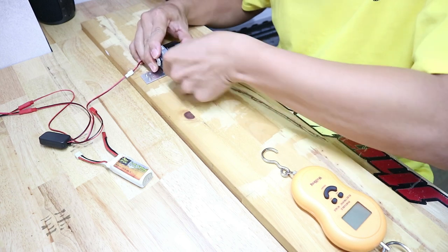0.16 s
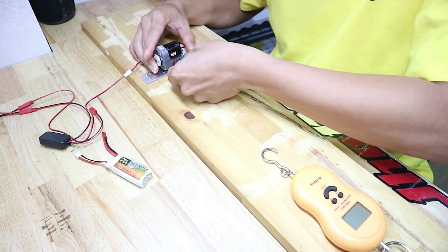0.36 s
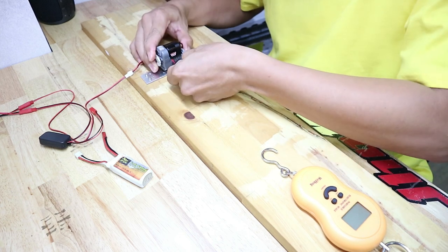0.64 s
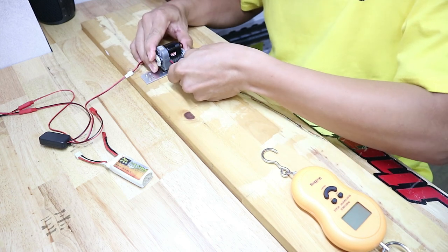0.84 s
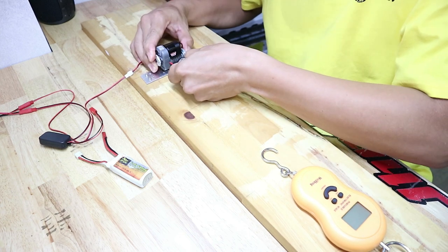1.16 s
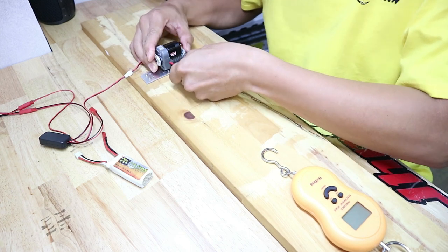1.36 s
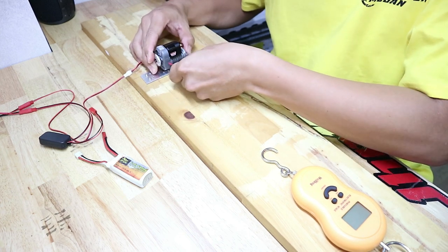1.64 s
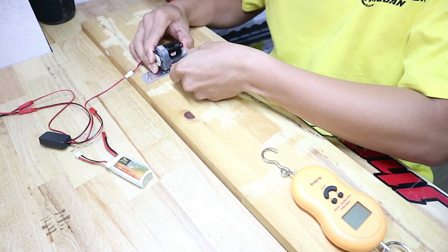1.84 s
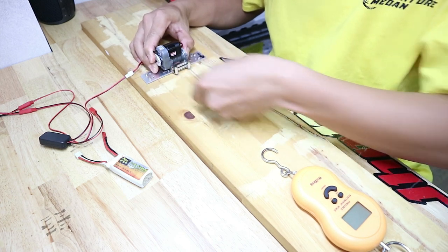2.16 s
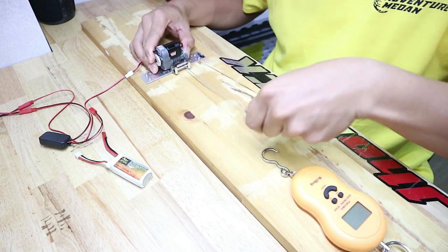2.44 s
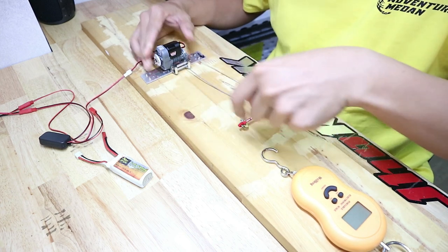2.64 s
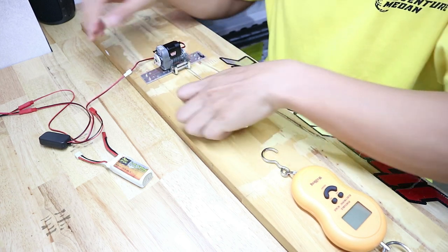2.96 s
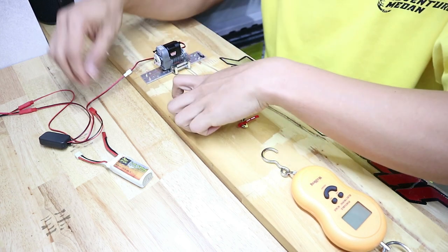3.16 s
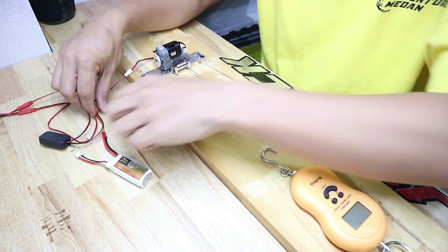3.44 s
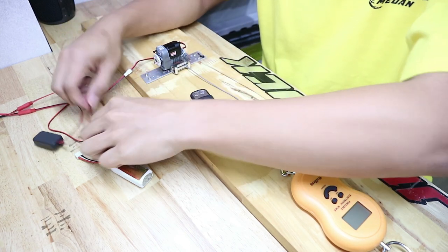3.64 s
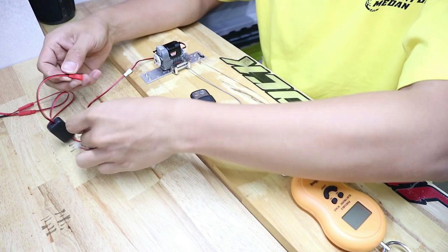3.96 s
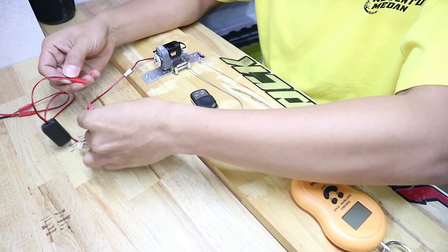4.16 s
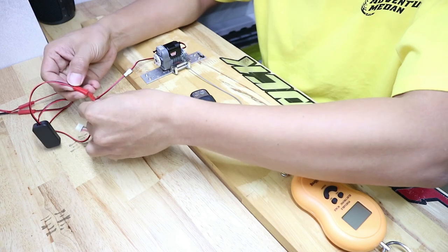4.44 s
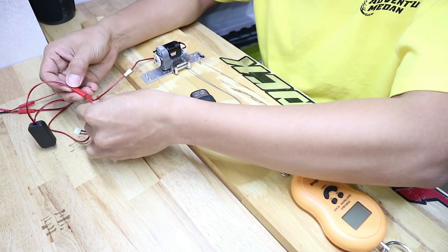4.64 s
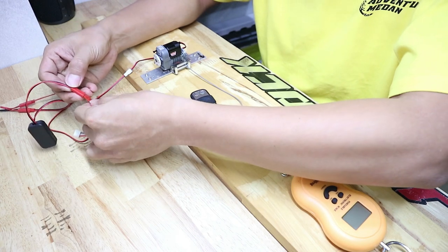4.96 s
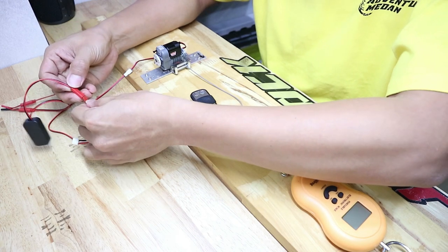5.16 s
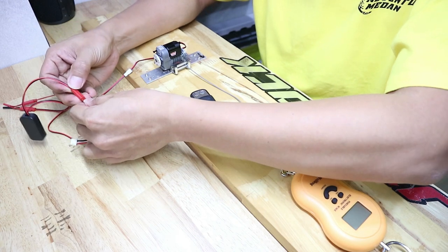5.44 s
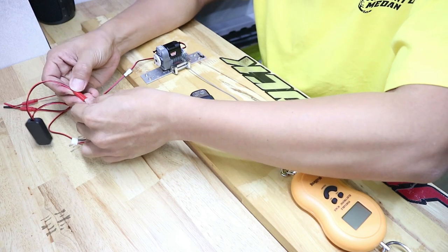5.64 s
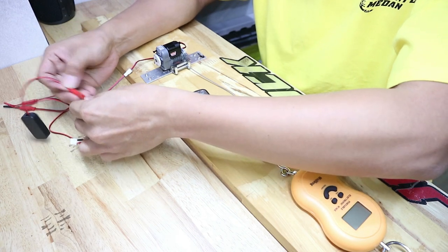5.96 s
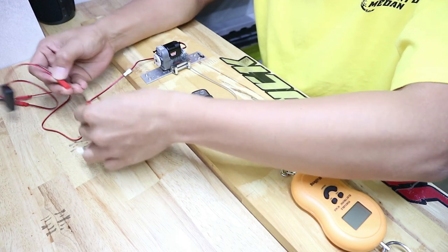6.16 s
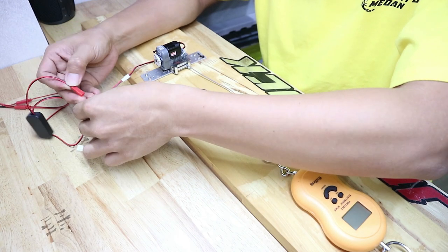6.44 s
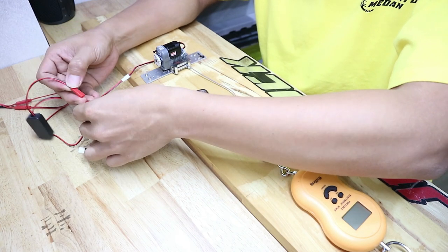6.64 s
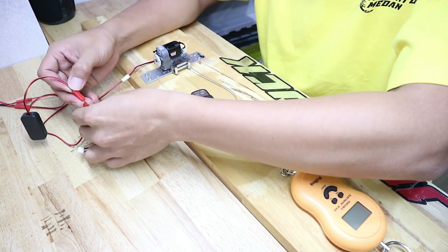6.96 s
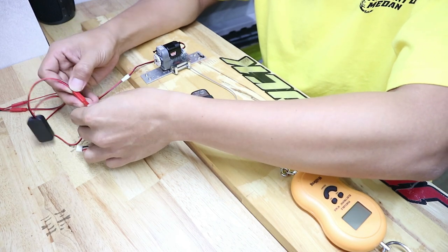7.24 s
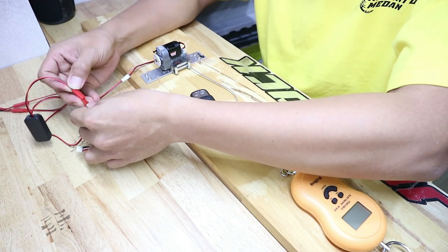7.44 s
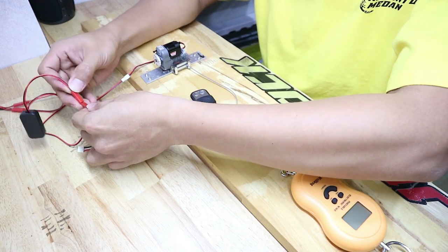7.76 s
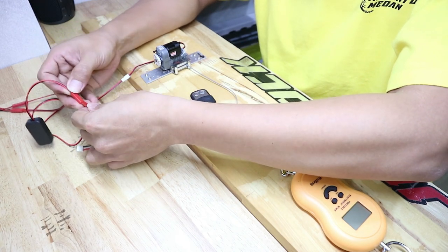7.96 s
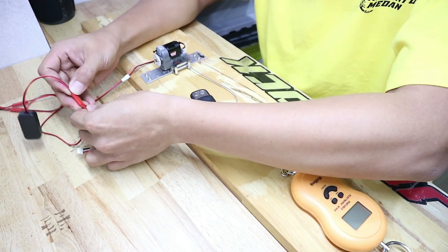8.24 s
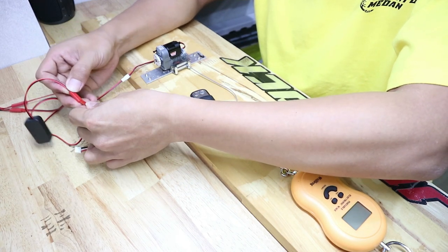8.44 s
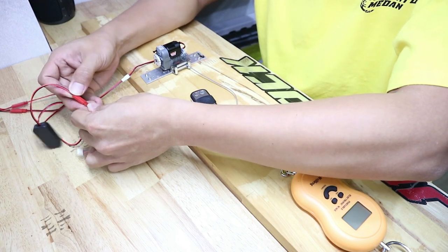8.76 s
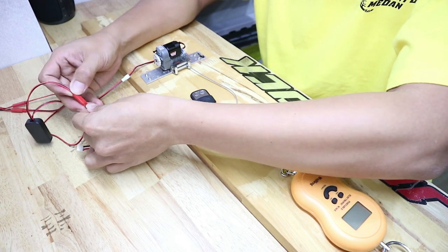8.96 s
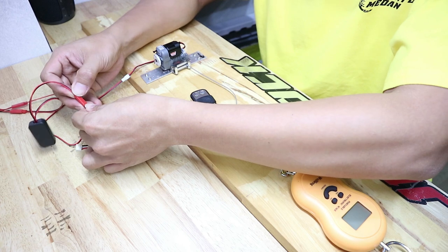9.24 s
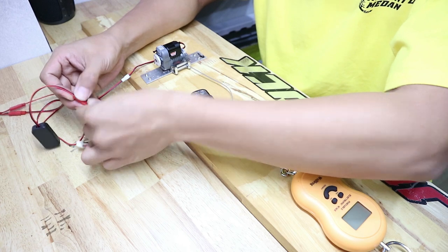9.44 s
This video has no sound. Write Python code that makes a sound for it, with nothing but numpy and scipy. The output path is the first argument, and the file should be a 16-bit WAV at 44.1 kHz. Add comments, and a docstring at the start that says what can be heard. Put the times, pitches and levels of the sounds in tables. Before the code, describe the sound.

A small quiet room, heard closely in stereo, with low mains hum and soft air. From 0 to 1.4 s fingers make faint clicks and scrapes on small winch parts, with a short drag around 0.5. A loud, sharp snap comes at 1.5, clacks near 1.9, and a cluster of clicks and rubbing from 2.2 to 2.6. At 3.25 a metal hook hits the wooden board and bounces in a quick, weakening rattle. Wires brush and knock at 3.6-3.9, then a hollow stuttering scrape near 4.0-4.2. At 5.65 a small geared motor starts abruptly, whining and rasping, cuts at 6.05 and coasts down by about 6.35. A distant engine swells around 5.5 and slowly recedes. Faint pin ticks and wire rustles follow from 6.4. A plug knocks at 8.87; the motor whirs again at 9.3, with a hard knock at 9.5, coasting from 9.7.

```python
"""A small room with a wooden workbench: fingers work the hook of a model winch loose and drop it on the board,
drag the wiring over, then touch a battery plug to the leads, and the motor whirs up twice and coasts down.
Blows ring damped modes with noise bursts, rubbing is shaped noise, and the motor is shaft orders plus gear rasp.
Mains hum, room air and a passing distant engine lie beneath; a camera's gain control ducks on loud peaks."""
import sys
import numpy as np
from scipy import signal
from scipy.fft import rfft, irfft, next_fast_len
from scipy.io import wavfile
from scipy.ndimage import uniform_filter1d, minimum_filter1d, map_coordinates

SR = 44100
rng = np.random.default_rng(int(sys.argv[2]) if len(sys.argv) > 2 else 0)


def store_pcm(level_fs):
    """Save levels as 16-bit WAV."""
    pcm = np.round(np.clip(level_fs, -1, 1) * 32767).astype(np.int16)
    wavfile.write(sys.argv[1], SR, np.atleast_2d(pcm).T)


N = 422919

# Winch parts clicking in the fingers. Each row: start in seconds, level in dB before the trim of the group,
# knock in the board in dB and sharp tick in dB, both relative to the click and trimmed later.
CLACK_HITS = [(0.053, -39, 1.5, -8), (0.413, -31, -7, -38), (0.457, -31, 0.5, -30),
              (0.556, -33.5, -20, -39), (0.982, -35, -4, -38), (1.376, -40.5, -17, -30.5),
              (1.477, 2, -21.5, -12), (1.612, -29.5, -1.5, -10), (1.644, -41.5, -24, -4),
              (1.716, -37.5, -1.5, -16), (1.753, -39.5, -11, -3.5), (1.881, -13.5, -14.5, -10.5),
              (1.911, -12, -3, -20), (1.938, -27, -19, -31), (2.030, -49, 7, -10), (2.201, -28.5, -12, -36),
              (2.222, -36, -7, -24), (2.269, -29.5, -16, -25), (2.291, -27, -10.5, -31),
              (2.333, -23, -0.5, -34), (2.346, -25.5, 0, -30.5), (2.383, -28, -1, -26),
              (2.420, -16.5, -9.5, -37), (2.437, -14.5, -7, -12), (2.446, -6, -34, -28),
              (2.536, -37, 2, -8), (2.605, -22, -11.5, -12), (2.835, -44.5, -20.5, -10.5),
              (2.892, -46, -10, -18)]
# Plugs knocking on the bench or snapping together. Each row: start in seconds, level in dB, relative tick in dB.
PLUG_HITS = [(3.63, -19, -29), (8.871, -7.5, -39), (9.4956, -4.5, -32), (9.4973, -1.5, -20.5)]
# Sharp edge of a contact. Each row: frequency in Hz, relative level in dB.
TICK_COLOUR = [(1500, -36), (3500, 3.5), (5800, 0), (7800, -11.5), (11000, -24.5), (16000, -29.5)]
# Casing resonances that gear teeth and fingers excite. Each row: centre in Hz, width in Hz, level in dB.
CASING_PEAKS = [(1214.6, 18, 6), (1440, 78, -2), (1920, 16, -1.5), (2140, 65, 8.5), (2430, 49, 0.5),
                (2850, 41, 3.5), (3390, 61, -1), (4520, 62, -7.5), (5550, 79, -11.5)]
# Stereo spread of sound from all sides. Each row: frequency in Hz, gain of the side signal in dB.
SIDE_GAIN = [(60, -35.5), (150, -27.5), (400, -9.5), (1300, -1), (2500, 1), (5000, 4), (9000, 8)]


def amp(db):
    """Amplitude factor of a level in dB."""
    return 10 ** (np.asarray(db) / 20)


def unit(x):
    """x scaled to rms 1."""
    return x / np.sqrt(np.mean(x ** 2) + 1e-20)


def along(points, hz):
    """Read a curve of (Hz, value) points on a log frequency axis."""
    f, v = np.transpose(points)
    return np.interp(np.log(hz + 1), np.log(f), v)


def curves(rows):
    """One value per sample for each column after the time."""
    s, *cols = np.transpose(rows)
    return [np.interp(np.arange(N) / SR, s, c) for c in cols]


def wobble(rate):
    """A smooth random curve with rate knots a second."""
    knots = rng.standard_normal(int(N * rate / SR) + 4)
    return map_coordinates(knots, [np.arange(N) * rate / SR])


def filtered(x, response):
    """x times a complex response of frequency."""
    n = x.shape[-1]
    m = next_fast_len(n + SR // 2)
    return irfft(rfft(x, m) * response(np.fft.rfftfreq(m, 1 / SR)), m)[..., :n]


def coloured(x, spectrum, size=2048):
    """x through a causal minimum-phase filter of the given (Hz, dB) shape."""
    cepstrum = irfft(np.log(amp(along(spectrum, np.fft.rfftfreq(size, 1 / SR)))))
    # folding the cepstrum onto positive time makes the filter minimum phase
    cepstrum[1:size // 2] *= 2
    cepstrum[size // 2 + 1:] = 0
    return signal.fftconvolve(x, irfft(np.exp(rfft(cepstrum))))[:len(x)]


def resonate(x, peaks):
    """x through parallel second-order resonances, each (Hz, width in Hz, dB)."""
    def response(f):
        return sum(amp(db) * 1j * f * w / (c * c - f * f + 1j * f * w) for c, w, db in peaks)
    return filtered(x, response)


def add(track, s, sound):
    """Lay a sound into a track at s seconds."""
    part = track[max(round(s * SR), 0):][:len(sound)]
    part += sound[:len(part)]


def diffuse(spectrum):
    """Stereo noise from all sides: independent mid, of rms 1, and side."""
    mid = unit(coloured(rng.standard_normal(N), spectrum))
    side = coloured(unit(coloured(rng.standard_normal(N), spectrum)), SIDE_GAIN)
    return np.array([mid + side, mid - side])


def hum():
    """Mains hum: sines that waver in level and phase."""
    # Each row: frequency in Hz, mean level in dB.
    partials = [(48.6, -43.5), (97.5, -51), (145, -46), (197, -54.5), (243, -54), (291, -56.5)]
    t = np.arange(N) / SR
    return sum(amp(db + 1.7 * wobble(8.3)) * np.sin(2 * np.pi * hz * t + 0.28 * wobble(3.0))
               for hz, db in partials)


def passing():
    """Level of the engine in dB: it nears quickly and recedes slowly."""
    nearest_s, nearest_db = 5.5, -40
    approach_s, recede_s = 0.68, 3.1  # time from half power to the peak, and from the peak to half power
    since = np.arange(N) / SR - nearest_s
    return nearest_db - 10 * np.log10(1 + (since / np.where(since < 0, approach_s, recede_s)) ** 2)


def engine():
    """Distant engine: multiples of its firing rate excite room modes, over a diffuse roar."""
    # Speed as it passes. Each row: time in seconds, mean firings per second.
    firing_rate = [(4.4, 60), (5.2, 63), (5.8, 63), (6.4, 59.5), (7.4, 55), (8.3, 49.5), (9.2, 51.5)]
    # Each row: multiple of the firing rate, relative level in dB.
    exhaust_partials = [(2, 0), (3, 2), (4, -4.5), (5, 1.5), (6, -6.5), (7, -11), (8, -13.5)]
    # Room modes. Each row: centre in Hz, width in Hz, level in dB.
    room_modes = [(103, 26, -2.5), (115, 9, 5), (165, 10, 2.5), (207, 34, -5.5), (233, 12, 2.5),
                  (248.1, 11, 2), (287, 15, -1), (339.1, 58, -10)]
    # Each row: frequency in Hz, relative level in dB.
    roar_colour = [(50, -33.5), (100, -1), (170, -3), (290, 3), (380, -13), (500, -19.5), (650, -23),
                   (1000, -36), (2000, -39.5), (5000, -59)]
    firing, = curves(firing_rate)
    turn = 2 * np.pi * np.cumsum(firing * (1 + .007 * wobble(12))) / SR
    exhaust = sum(amp(db + 3 * wobble(5.8)) * np.sin(order * turn + rng.uniform(0, 2 * np.pi))
                  for order, db in exhaust_partials)
    exhaust = unit(resonate(exhaust, room_modes))  # each partial swells as it slides through a room mode
    return amp(passing()) * (amp(-1.0) * exhaust + amp(-6.5) * diffuse(roar_colour))


def background():
    """Room air as diffuse noise, with the mains hum and the distant engine."""
    # Each row: frequency in Hz, relative level in dB.
    air_colour = [(20, -34.5), (35, -24), (55, -9.5), (130, -8.5), (250, -6), (325, -8.5), (750, -31),
                  (1020, -24.5), (1600, -31.5), (2200, -32.5), (7000, -48.5), (8700, -47.5), (10500, -64),
                  (13000, -55.5), (15500, -61)]
    return hum() + amp(-50.0) * diffuse(air_colour) + engine()


def strokes(table, fall_s):
    """Gain of rubbing strokes: each swells to its peak and dies away, linearly in dB."""
    depth_db = 27.5  # rise and fall times each span this depth
    t = np.arange(N) / SR
    return sum(amp(db - depth_db * np.maximum((s - t) / rise_s, (t - s) / fall_s)) for s, rise_s, db in table)


def scrape(spectrum, grain_db, clump_db):
    """Friction of rms 1: noise whose level clumps like tiny slips."""
    slips = rng.standard_normal(N) * amp(grain_db * wobble(500) + clump_db * wobble(45))
    return unit(coloured(slips, spectrum))


def grit(rate=50, scatter_db=4.5, t60=.032):
    """Tiny random catches of skin and cable: decaying noise ticks that ring the winch casing, rms 1."""
    # Each row: frequency in Hz, relative level in dB.
    catch_colour = [(900, -19.5), (1300, -5.5), (2600, 3.5), (4000, -2.5), (6000, -11.5), (9000, -29),
                    (15000, -38)]
    strength = amp(scatter_db * np.clip(rng.standard_normal(N), -2, 2))
    catches = (rng.uniform(size=N) < rate / SR) * strength
    ticks = signal.lfilter([1], [1, -amp(-60 / (t60 * SR))], catches) * rng.standard_normal(N)
    return unit(unit(resonate(ticks, CASING_PEAKS)) + unit(coloured(ticks, catch_colour)))


def rubbing():
    """Fingers scrape and catch on the winch; wires brush over the bench and the hands."""
    # Fingers twist the hook. Each row: time of the peak in seconds, rise in seconds, relative level in dB.
    twists = [(0.1, 0.1, -58), (0.23, 0.15, -50.5), (0.42, 0.087, -56), (2.08, 0.4, -50.5),
              (2.21, 0.16, -48.5), (2.29, 0.055, -40.5), (2.41, 0.18, -40), (2.54, 0.045, -43),
              (3.2, 0.24, -54)]
    # Wires brush past. Each row: time of the peak in seconds, rise in seconds, level in dB before the trim.
    wire_strokes = [(0.455, 0.044, -37), (0.495, 0.056, -50), (3.68, 0.095, -39), (3.81, 0.18, -34.5),
                    (3.91, 0.045, -46), (4.0, 0.12, -50), (6.38, 0.048, -47), (6.49, 0.22, -41),
                    (7.18, 0.084, -51), (7.27, 0.05, -52.5), (7.485, 0.037, -44), (8.66, 0.04, -52)]
    # Colours of fingers and wires. Each row: frequency in Hz, relative level in dB.
    finger_colour = [(250, -24), (380, 1), (620, -23.5), (850, -15), (1210, 2.5), (1600, -7.5),
                     (2500, -2.5), (4000, -13.5), (6000, -23.5), (14000, -51)]
    wire_colour = [(300, -14.5), (600, -1), (900, 0.5), (1500, -1), (2200, 3.5), (2900, -6), (3800, -15),
                   (6000, -20), (14000, -49.5)]
    grip_end_s, grip_db = 2.9, -66  # a faint steady scrape while the fingers hold the winch
    grip = amp(grip_db) * (np.arange(N) / SR < grip_end_s)
    pressure = grip + strokes(twists, fall_s=0.13)
    friction = amp(-3.5) * scrape(finger_colour, grain_db=0.5, clump_db=6)
    fingers = pressure * (friction + amp(-7.5) * grit())
    wires = amp(-3.5) * strokes(wire_strokes, fall_s=0.11) * scrape(wire_colour, grain_db=2.5, clump_db=4.0)
    return fingers + wires


def drag(slip_rate=130):
    """Stick and slip over the wood: impulses at an unsteady rate ring a hollow resonance."""
    # The winch, later the switch box. Each row: time of the peak in seconds, rise in seconds, level in dB.
    tugs = [(0.465, 0.017, -33), (0.5, 0.046, -39), (3.975, 0.017, -32.5), (4.02, 0.07, -35.5),
            (4.1, 0.089, -35), (4.18, 0.067, -33.5)]
    slips = np.diff(np.floor(np.cumsum(slip_rate * amp(3.3 * wobble(90))) / SR), prepend=0)
    hollow = resonate(slips, [(310, 59, 0.0), (438, 28, -13.0)])
    hollow = resonate(hollow, [(313.0, 230, 0)])
    sound = unit(coloured(hollow, [(420, -3.0), (540, -13), (1000, 5), (3000, -24)]))
    return strokes(tugs, fall_s=0.069) * sound


def full(x, size=88):
    """Scale a hit so that its loudest two milliseconds have rms 1."""
    return x / np.sqrt(uniform_filter1d(x ** 2, size).max())


def ring(modes, scatter_db=2, detune=0.007):
    """Damped sine modes whose strength, pitch and sign vary at every blow."""
    t = np.arange(SR // 3) / SR
    chance = rng.standard_normal((len(modes), 3))
    sound = np.zeros(len(t))
    for (hz, db, t60), (strength, pitch, sign) in zip(modes, chance):
        decay = amp(db + scatter_db * strength - 60 * t / t60)
        sound += np.sign(sign) * decay * np.sin(2 * np.pi * hz * (1 + detune * pitch) * t)
    return full(sound)


def burst(spectrum, t60, chatter_db, chatter_t60):
    """Contact noise: a sharp crack plus chatter with its own decay as the parts settle."""
    t = np.arange(SR // 3) / SR
    decay = amp(-60 * t / t60) + amp(chatter_db - 60 * t / chatter_t60)
    return full(coloured(rng.standard_normal(len(t)) * decay, spectrum))


def contacts(table, modes, soft_hz, crack_db, crack_t60, chatter_db, board_db, edge_db, lead_db, lead_t60=0.01):
    """Each (s, dB, knock dB, tick dB) contact swells in briefly, cracks, rings the part and knocks the board."""
    # Each row: frequency in Hz, relative level in dB.
    crack_colour = [(200, -25), (800, -20.5), (1300, -1.5), (2300, 6), (3500, -3.5), (5000, -19.5),
                    (9000, -47.5)]
    # Each row: frequency in Hz, relative level in dB, t60 in seconds.
    board_modes = [(215, -13, 0.098), (305, -9, 0.034), (351, 2.5, 0.17), (397, -0.5, 0.12),
                   (492, -8.5, 0.094), (674, -23, 0.081)]
    bodies, ticks = np.zeros(N), np.zeros(N)
    for s, db, knock_db, tick_db in table:
        crack = burst(crack_colour, crack_t60, chatter_db, chatter_t60=0.06)
        body = full(ring(modes) + amp(crack_db) * crack)
        add(bodies, s, amp(db) * (body + amp(knock_db + board_db) * ring(board_modes)))
        tick = burst(TICK_COLOUR, crack_t60, chatter_db, chatter_t60=0.077)
        add(ticks, s, amp(db + tick_db + edge_db) * tick)
        # a short noise swell leads into the hit
        lead = burst(crack_colour, lead_t60, chatter_db, chatter_t60=lead_t60)[:SR // 50][::-1]
        add(bodies, s - len(lead) / SR, amp(db + lead_db) * lead)
    # a softer contact lasts longer and passes less treble
    return signal.sosfilt(signal.butter(4, soft_hz, fs=SR, output="sos"), bodies) + ticks


def bounces():
    """Hook landings: it strikes, bounces in shortening, weakening flights and topples; its far end follows."""
    # Each row: start in seconds, level in dB before the trim, number of contacts.
    drops = [(3.244, 3.5, 1), (3.262, -4.5, 1), (3.276, 7.5, 4), (3.339, -1, 1)]
    flight_s, rebound, loss_db = 0.02, 0.93, 6  # first flight; length ratio and level loss per bounce
    far_delay_s, far_db = .007, -2.5  # its other end lands just after, duller
    rows = []
    for start, first_db, count in drops:
        for k in range(round(count)):
            s = start + flight_s * sum(rebound ** j for j in range(k))
            db = first_db - loss_db * k
            # each row ends with the knock and tick levels, in dB
            rows += [(s, db, -20.5, -14), (s + far_delay_s, db + far_db, -13.5, -20)]
    return rows


def handling():
    """Clicks of the winch, the falling hook, the plugs and their pins, and dull thumps in the bench."""
    # What rings. Each row: frequency in Hz, relative level in dB, t60 in seconds.
    winch_modes = [(1220, -7.5, 0.04), (1550, -12, 0.0095), (1970, -4, .022), (2222, 0, 0.062),
                   (2776, 2.5, 0.034), (3580, -3.5, 0.029), (4502, -16, 0.012), (5900, -11.5, 0.013)]
    hook_modes = [(662, -8.5, 0.067), (860, -29.5, 0.023), (1040, -6.5, 0.036), (1200, 6, 0.056),
                  (1478, 4, 0.052), (1646, 1, 0.051), (2028, -9, 0.028), (2310, -17, .025),
                  (2720, -10.5, .02), (3150, -7, 0.017)]
    plug_modes = [(284, -9.5, 0.043), (660, -7, 0.041), (880, -6.5, 0.015), (967, -9.5, 0.12),
                  (1127, -17, 0.11), (1336, -5.5, 0.025), (1836, -7, 0.032), (2090, -1, 0.034),
                  (2314, 13, 0.0078)]
    bench_modes = [(84.8, -5.5, 0.602), (105.2, 2, 0.35), (154, 1.5, 0.14), (216.7, -5, 0.18)]
    # Connector pins ticking together. Each row: start in seconds, level in dB before the shell and tick mix.
    pin_hits = [(4.819, -50.5), (5.423, -52.5), (6.368, -43.5), (6.418, -29.5), (6.570, -47.5),
                (7.289, -49.5), (8.807, -45)]
    # Weight landing on the bench. Each row: start in seconds, level in dB.
    thumps = [(0.059, -33), (0.204, -33), (0.443, -29.5), (0.487, -29), (1.912, -22.5), (3.244, -21.5),
              (3.74, -29.5), (3.769, -22), (8.87, -27), (9.495, -19.5)]
    winch = amp(-6.5) * contacts(CLACK_HITS, winch_modes, soft_hz=6500, crack_db=2.5, crack_t60=0.027,
                                 chatter_db=-6.0, board_db=4.5, edge_db=4.0, lead_db=-15.5, lead_t60=0.021)
    hook = amp(-6.0) * contacts(bounces(), hook_modes, soft_hz=5610, crack_db=-6.0, crack_t60=0.024,
                                chatter_db=-11.5, board_db=1.5, edge_db=2.5, lead_db=-22.5)
    knocks = [(s, db, -23.5, tick_db) for s, db, tick_db in PLUG_HITS]  # every plug knocks the board alike
    plugs = contacts(knocks, plug_modes, soft_hz=2680, crack_db=-5.5, crack_t60=0.0064,
                     chatter_db=-9.5, board_db=1.5, edge_db=4.5, lead_db=-22)
    pins, bench = np.zeros(N), np.zeros(N)
    for s, db in pin_hits:
        shell = amp(-7) * ring(winch_modes)  # the small plastic shell rings much like the winch parts
        add(pins, s, amp(db) * (shell + burst(TICK_COLOUR, t60=0.0039, chatter_db=12, chatter_t60=0.027)))
    for s, db in thumps:
        add(bench, s, amp(db) * ring(bench_modes))
    return winch + hook + plugs + pins + bench


def spill(table, spectrum, size=1024):
    """Sound that blows send away from the microphones: modes blend into one smooth pulse of unit energy."""
    pulse, track = coloured(signal.unit_impulse(size), spectrum), np.zeros(N)
    for s, db, *_ in table:
        add(track, s, amp(db) * pulse / np.linalg.norm(pulse))
    return track


def handling_spill():
    """What the blows of winch, hook and plugs send to the walls."""
    # Each row: frequency in Hz, relative level in dB.
    winch_colour = [(120, -12), (330, -5.5), (750, -14.5), (1200, -2), (1450, -6.5), (2000, -2),
                    (2450, 1.5), (3200, -10.5), (4200, -11.5), (6200, -21), (7500, -31), (14000, -47.5)]
    hook_colour = [(200, -10.5), (750, -11.5), (1100, 1), (1700, -5.5), (2400, -1.5), (3300, -12.5),
                   (5500, -19), (12000, -30)]
    plug_colour = [(120, -2), (400, 5.5), (750, -4.5), (950, 1), (1600, 2.5), (2450, -4), (2900, -15),
                   (3600, -30), (8000, -50)]
    winch = amp(4.5) * spill(CLACK_HITS, winch_colour)
    hook = amp(5.5) * spill(bounces(), hook_colour)
    return winch + hook + amp(7.0) * spill(PLUG_HITS, plug_colour)


def drive():
    """Shaft speed in Hz and loudness: the motor spins up under power and friction brakes it afterwards."""
    # The plug feeds the motor. Each row: on in seconds, off in seconds,
    # time for the gears to take up load in seconds, spin-up time in seconds.
    runs = [(5.643, 6.053, 0.022, .048), (9.302, 9.7, 0.012, 0.044)]
    full_hz, start_share, coast_hz_per_s = 243.3, .7, 840  # start_share of the speed is reached at once
    run_db, speed_power = -31.5, 1.77  # gain at full speed before strain; gain grows as this power of speed
    strain_db, strain_s = 6, 0.28  # louder at switch-on, fading
    overrun_db, overrun_s = 6, 0.045  # louder when the gears overrun the unpowered shaft
    t = np.arange(N) / SR
    speed, gain = np.zeros(N), np.zeros(N)
    for on, off, attack_s, spin_up_s in runs:
        powered, coasting = np.maximum(t - on, 0), np.maximum(t - off, 0)
        hz = full_hz * (1 - (1 - start_share) * np.exp(-powered / spin_up_s)) - coast_hz_per_s * coasting
        hz = np.maximum(hz, 0) * (t > on)
        load_db = strain_db * np.exp(-powered / strain_s) + overrun_db * (1 - np.exp(-coasting / overrun_s))
        speed += hz
        gain += amp(run_db + load_db) * (hz / full_hz) ** speed_power * (1 - np.exp(-powered / attack_s))
    return speed, gain


def motor(grain_db=3.0, step_db=2.0, rattle_db=3.0, dulling_db=3.0, shake_db=1.3):
    """Clean shaft orders whine in the housing; brushes and gear teeth rasp, ring the casing and shake the board."""
    # Each row: multiple of the shaft speed, relative level in dB.
    whine_orders = [(1, 3), (2, 4), (3, -12), (4, -7), (5, -19), (6, -2.5), (8, -7.5), (9, -12), (10, -6.5),
                    (12, -2), (13.4, -10), (16, -13), (18, -14), (24.5, -13.5), (28.4, -12.5)]
    # Each row: frequency in Hz, relative level in dB.
    gear_colour = [(400, -27), (700, -36), (950, -22), (1250, -9), (1700, -7), (2100, -3), (2450, -3.5),
                   (2800, 1), (3150, -7.5), (3600, -16), (5000, -10), (5850, -9), (6400, -15.5),
                   (9000, -21.5), (11000, -62), (15000, -32)]
    # Resonances of the housing and of the board under the motor. Each row: centre in Hz, width in Hz, level in dB.
    housing_peaks = [(431, 117, -1), (953, 69, -11.5), (1210, 65, -8), (1441, 25, -2.5), (2148, 240, -3),
                     (2670, 380, 1), (3868, 41, 0), (5500, 620, -2.5)]
    mount_peaks = [(245, 14, -2), (299, 13, 3.5), (360, 100, -4), (428, 39, 5.5)]
    gear_ratio, eccentric_rad = 5.3, 0.05  # shaft turns per turn of the first gear; how far it rocks the shaft
    flutter, backlash_rad, slack_play = .003, .011, .5  # random speed share, tooth play, extra share of play
    waver_db, slack_waver_db = 1.8, 1.5  # random level of the orders, and more of it when slack
    speed, loudness = drive()
    slack = np.clip(3 * (1 - speed / speed.max()), 0, 1)  # below full speed the gears run slack
    # an off-centre gear and play in the teeth rock the shaft angle, which frays the high orders most
    turn = 2 * np.pi * np.cumsum(speed * (1 + flutter * wobble(45))) / SR
    rocking = eccentric_rad * np.sin(turn / gear_ratio)
    turn = turn + rocking + backlash_rad * (1 + slack_play * slack) * wobble(260)
    orders = np.zeros(N)
    for order, db in whine_orders:
        level = amp(db + (waver_db + slack_waver_db * slack) * wobble(75))
        orders += level * np.sin(order * turn + rng.uniform(0, 2 * np.pi))
    whine = resonate(orders, housing_peaks)  # a tone swells as it glides through a resonance
    steps = np.cos(2 * turn) + np.cos(6 * turn)  # the rasp pulses twice and six times a turn
    rattle = rattle_db * slack * wobble(130)  # coarse when slack
    teeth = rng.standard_normal(N) * amp(step_db * steps + grain_db * wobble(260) + rattle)
    casing = unit(resonate(teeth * rng.choice([-1, 1], N), CASING_PEAKS))  # random signs: unlike the gear noise
    rasp = amp(-6.0) * unit(coloured(teeth, gear_colour)) + amp(-7.5) * casing
    board_colour = [(100, -15.5), (250, -0.5), (480, -5.0), (590, -22.0), (1500, -22.0)]
    board = unit(coloured(resonate(teeth, mount_peaks), board_colour))
    rough = amp(-dulling_db * slack) * rasp + amp(-3.0 + shake_db * slack) * board
    return loudness * whine, loudness * rough


def reflections(x, away, early_db, tail_db, early_t60=0.044, size=16384):
    """Mid and side echoes, redrawn at random for every block: bench and arms answer at once, walls with a tail."""
    # Each row: frequency in Hz, t60 in seconds.
    wall_decay = [(150, 1), (500, 0.29), (2000, 0.37), (5000, 0.33), (12000, 0.17)]
    mid, side = np.zeros(N), np.zeros(N)
    near, far = amp(early_db) * x, amp(tail_db) * x + away
    for start in range(0, N, size):
        hz, t, z = signal.stft(rng.standard_normal((2, SR // 2)), SR, nperseg=256)
        tail = signal.istft(z * amp(-60 * t / along(wall_decay, hz)[:, None]), SR, nperseg=256)[1]
        early = rng.standard_normal((2, SR // 8)) * amp(-60 * np.arange(SR // 8) / SR / early_t60)
        for source, echo in (near, early), (far, tail):
            pair = signal.fftconvolve(source[None, start:start + size], echo / np.linalg.norm(echo[0]), axes=1)
            add(mid, start / SR, pair[0])
            add(side, start / SR, pair[1])
    return mid, side


def room(x, away, early_db, tail_db, lag=.00002):
    """Direct sound and echoes at two microphones, as mid and side signals; lag in seconds."""
    # The board sounds nearer the left microphone. Each row: frequency in Hz, side gain in dB.
    left_lean = [(150, -38.5), (350, -23), (520, -7), (750, -6), (1200, -40.5), (3000, -19.5)]
    mid, side = reflections(x, away, early_db, tail_db)
    # toward the treble the camera body makes the two microphones hear different things
    side = coloured(coloured(side, SIDE_GAIN), [(400, 3.0), (2500, -12.5), (5000, -5.0), (9000, -0.5)])
    # the direct sound reaches the left microphone a little early
    side += filtered(x, lambda hz: amp(along(left_lean, hz)) + 1j * np.sin(np.pi * hz * lag))
    return x + np.array([mid + side, mid - side])


def scene():
    """Hands and motor sound in the room, over its background."""
    backdrop = background()
    hands = room(handling() + rubbing() + drag(), handling_spill(), early_db=-5.5, tail_db=-17.0)
    whine, rasp = motor()  # the whine comes mostly straight; the rasp scatters to the walls
    return backdrop + hands + room(whine + rasp, amp(-6.0) * rasp, early_db=-13, tail_db=-13)


def record(dry, threshold_db=-13, hold=0.11, release_db=22, attack=0.0052):
    """Gain control ducks on loud peaks, holds and creeps back; what slips through clips; the band ends steeply."""
    # hold and attack in seconds, release in dB per second
    low_hz, top_hz, edge_hz = 32, 16000, 400
    t = np.arange(N) / SR
    power = signal.lfilter([1 / (attack * SR)], [1, 1 / (attack * SR) - 1], np.mean(dry ** 2, axis=0))
    excess_db = np.maximum(10 * np.log10(power + 1e-12) - threshold_db, 0)
    span = int(hold * SR) // 2 * 2 + 1
    held_db = -minimum_filter1d(-excess_db, span, origin=span // 2, mode="constant")
    duck_db = np.maximum.accumulate(held_db + release_db * t) - release_db * t
    clipped = np.clip(dry * amp(-duck_db), -1, 1)

    def band(hz):
        return np.clip((top_hz - hz) / edge_hz, 0, 1) * hz ** 4 / (hz ** 4 + low_hz ** 4)
    return filtered(clipped, band)


dry = scene()
out = record(dry)
store_pcm(out)
```